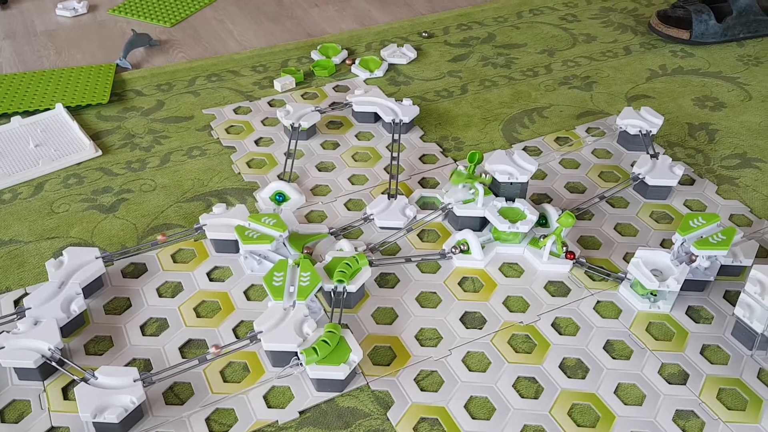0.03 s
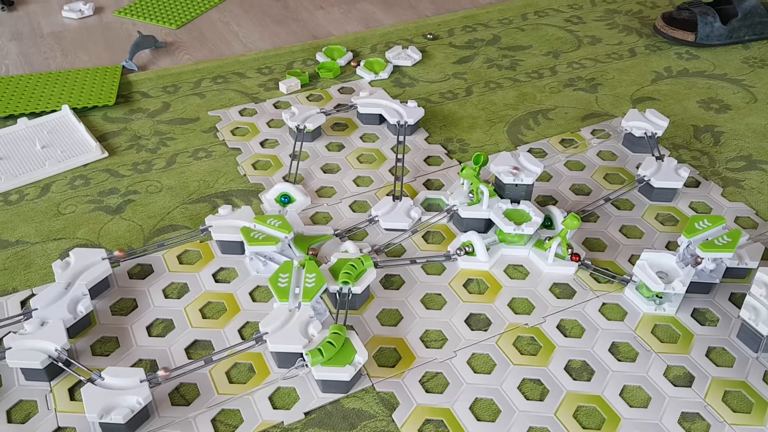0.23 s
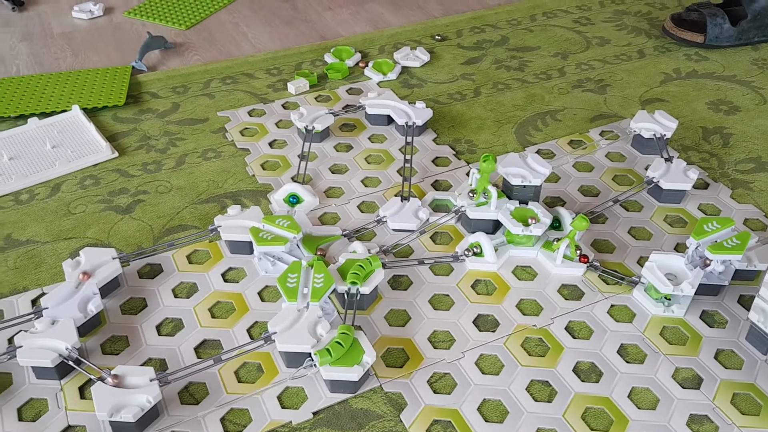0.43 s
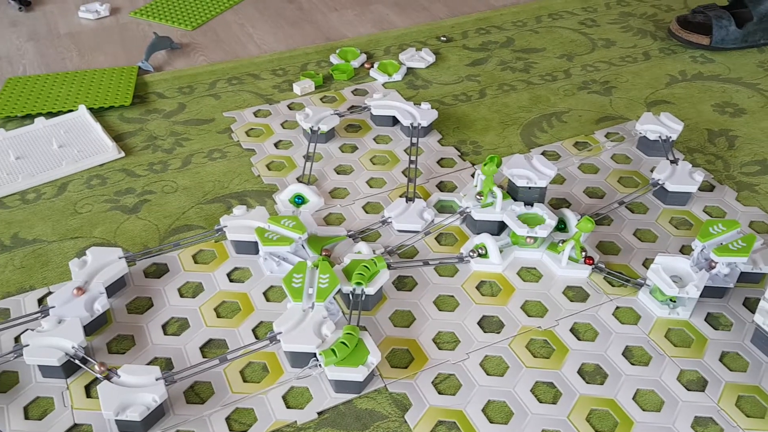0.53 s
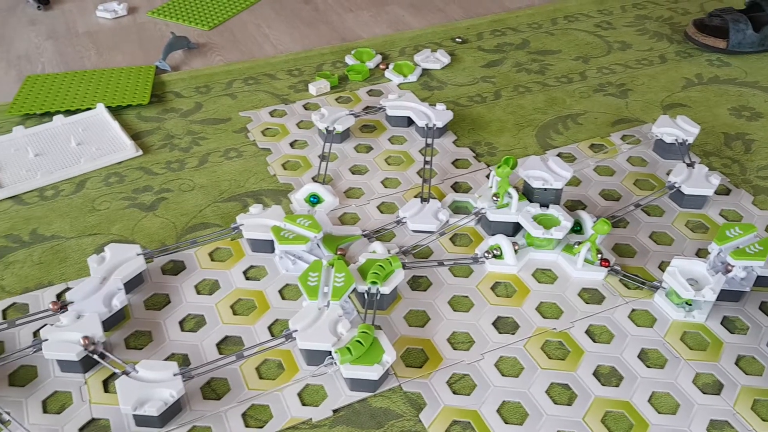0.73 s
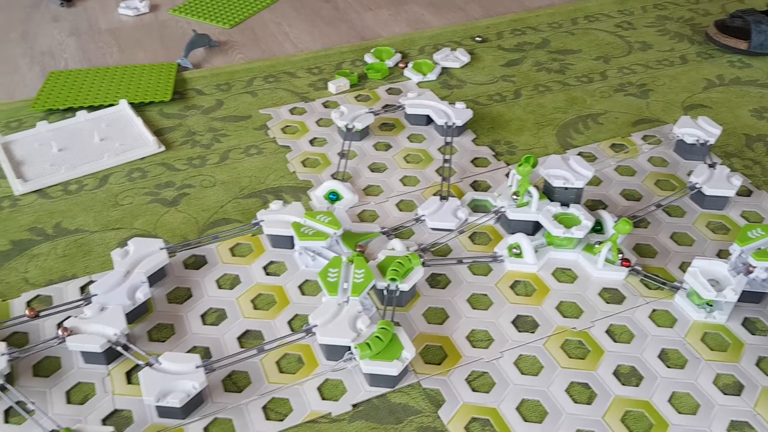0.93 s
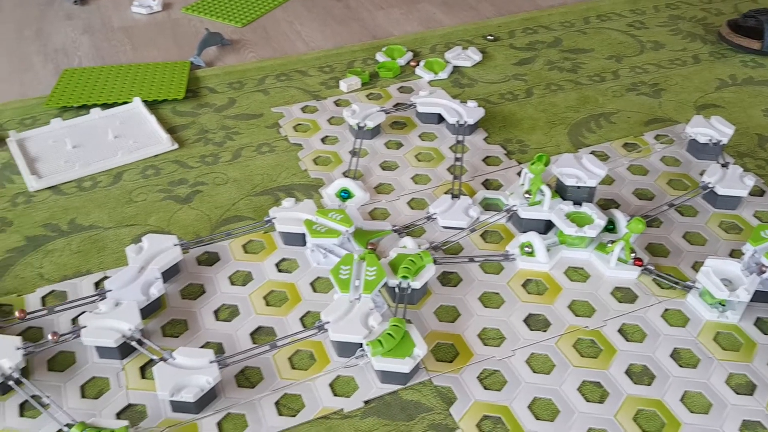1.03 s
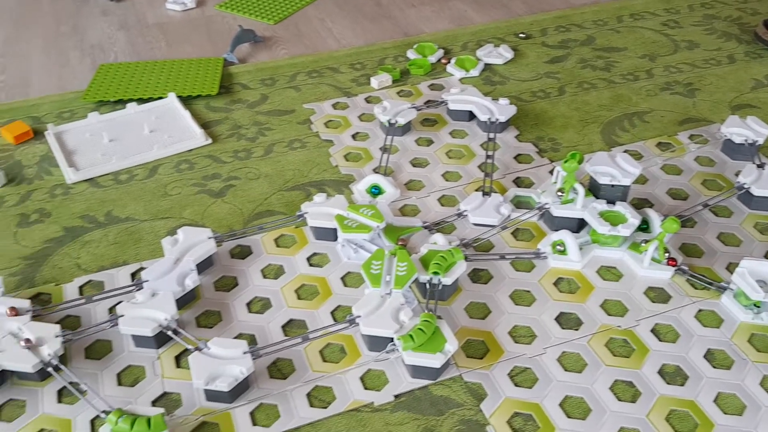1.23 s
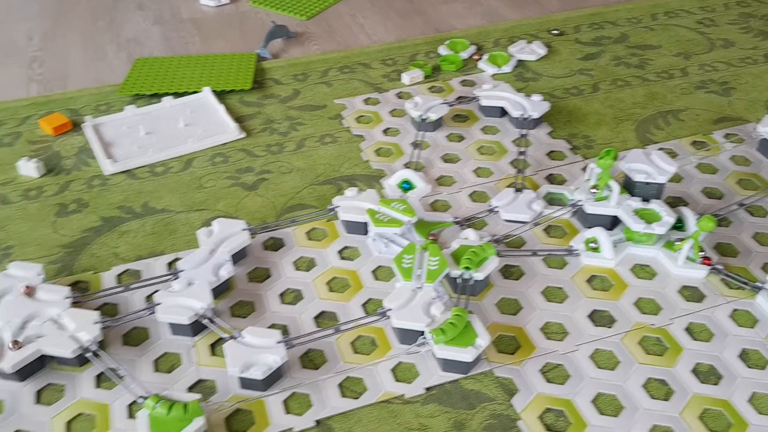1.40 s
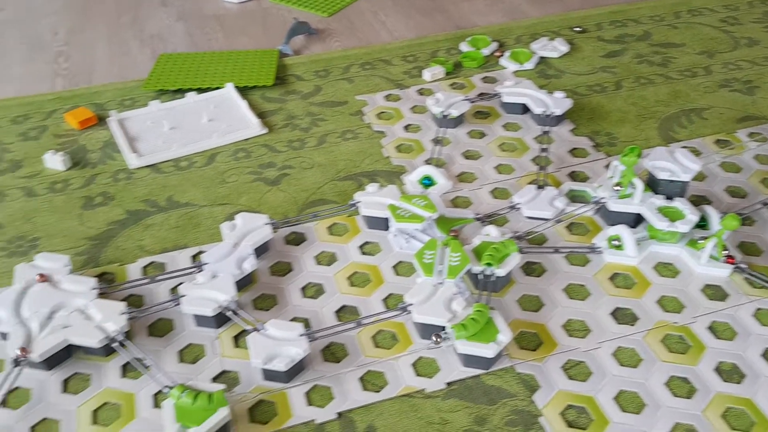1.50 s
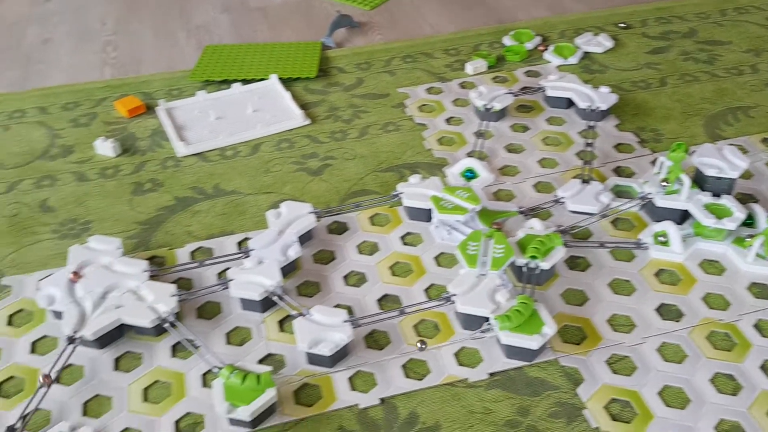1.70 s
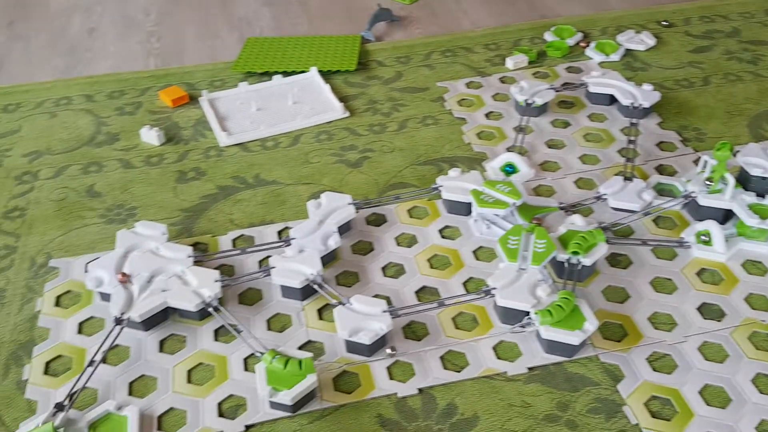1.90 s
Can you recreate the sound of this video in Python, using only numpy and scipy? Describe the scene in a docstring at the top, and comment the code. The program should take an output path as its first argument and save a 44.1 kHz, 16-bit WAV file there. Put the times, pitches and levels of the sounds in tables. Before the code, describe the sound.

Marbles rattle along the rails of a plastic track, clacking against its pieces. One strikes another with a high, bright click, and the rolling continues with lighter knocks. The room adds a short echo and a faint hum.

```python
"""Steel marbles roll, rattle and clack through a plastic marble track on the floor of a fairly live room.
Each hit on a tile or switch rings that plastic piece and, faintly, the rails; at joints the marbles
skitter in quick runs of contacts. One hard steel-on-steel strike rings high and bright. The rolling is
a stream of tiny random contacts on the rails, over a faint low room hum."""
import sys
import numpy as np
from scipy import signal
from scipy.fft import rfft, irfft
from scipy.io import wavfile

SR = 44100
rng = np.random.default_rng(int(sys.argv[2]) if len(sys.argv) > 2 else 0)


def to_wav(s):
    """Save 16-bit WAV."""
    ch = np.atleast_2d(s).T  # columns
    pcm = np.round(np.clip(ch, -1, 1) * 32767)  # PCM
    wavfile.write(sys.argv[1], SR, pcm.astype(np.int16))


N = 85995
SIZE = 2 ** 15  # samples per hit
HZ, T = np.fft.rfftfreq(SIZE, 1 / SR), np.arange(SIZE) / SR
SCENE_HZ = np.fft.rfftfreq(N, 1 / SR)
HIT_GAIN = np.sqrt(.004 * SR)  # unit energy to rms 1 over 4 ms


# marble on plastic: (time [s], level [dB], body [dB], knock [dB], treble [dB], tail [dB],
# resonances of the piece [(frequency [Hz], level is not set per resonance)])
CLACKS = [(.2212, -32.5, -3.5, 0.5, -14, -1, [290, 880, 1110, 1320, 1760, 2760]),
          (.229, -30, -8.5, -1, -6, -1.5, [780, 1110, 1850]),
          (.4032, -17, 0, -6, -2, -1, [360, 640, 2780, 2980]), (.4175, -21.5, -6, 0.5, 1, -2, [6400, 6400]),
          (.483, -25, 0.5, -0.5, -4.5, 2, [4770]), (.5388, -25.5, -1, 4.5, 4, -1.5, [1280, 1950, 3990]),
          (.5665, -26.5, -3, 2, -7, -1, [1650, 2740, 4660]),
          (.5915, -31.5, 4.5, 7.5, 3, -1.5, [1500, 2030, 5900]), (.6885, -38.5, 7, 0, -6, -7, [840, 730]),
          (.8027, -21.5, -7.5, -16, 10.5, 2, [5250]), (.808, -26.5, -3.5, -1.5, -10, -1, [300, 1050]),
          (.9793, -29.5, 0, -3, 0, -2, [700, 1900, 2050, 6080]), (1.0185, -31, -1.5, -4, -4.5, 2, []),
          (1.3197, -33.5, 1, 1.5, -10.5, -1, [4270]), (1.3387, -35, 1.5, -6, -15, -4, [1770]),
          (1.4445, -41, 8.5, 3.5, -10, 0, [950, 1420, 1720]), (1.5448, -36.5, 7.5, 1, -11, -1, []),
          (1.6805, -38.5, 4, 0.5, -15, -5, [950, 1150, 2100, 4100]),
          (1.9067, -33.5, -4, 1.5, -10, -2, [930, 1290, 2180])]
# further hits on the plastic pieces, all with one shared tone: (time [s], level [dB])
TICKS = [(.111, -41.5), (.312, -41), (.796, -30.5), (1.109, -35.5), (1.129, -41.5), (1.1915, -35),
         (1.292, -39.5), (1.358, -41), (1.859, -37.5)]
# tone of all ticks: (body [dB], knock [dB], treble [dB], tail [dB])
TICK_TONE = (-3.5, -7, -9.5, -1)

def clacks_and_ticks():
    """Single impacts of marbles on the plastic pieces of the track."""
    ticks = [(s, db, *TICK_TONE, []) for s, db in TICKS]
    return plastic_hits(CLACKS + ticks, impact)


# runs over joints: (time [s], level [dB], body [dB], knock [dB], treble [dB], tail [dB], resonances [Hz])
SKITTERS = [(.463, -27.5, -3, 2, -14, 0, [750, 2920]), (.678, -37.5, 7.5, 6, -1, -0.87, [2750, 4700]),
            (.861, -28, -10, -6.5, 6.5, -0.47, [7830]), (.937, -33, -6.5, -5, -1, -0.51, []),
            (1.375, -41.5, -2, 2, -24, -0.084, [4400]), (1.481, -34, 0.5, -10.5, -10, 0, []),
            (1.886, -35.5, -9, -3, -7, -1, [])]

def skitters(swell_s=.0043):
    """A marble crosses a joint in a run of contacts that swells and dies within milliseconds."""
    return plastic_hits(SKITTERS, lambda: chatter(T * decay(swell_s)))


# spectrum of struck plastic: (frequency [Hz], gain [dB])
PLASTIC_SPECTRUM = [(50, -24), (170, -11.5), (290, -4.5), (450, -5), (720, 1), (1500, 4), (5400, 4),
                    (7100, 7), (8400, -10.5), (12000, -4), (15800, -9)]
# faint rings of rails and plates: (frequency [Hz], level [dB])
RAIL_MODES = [(1670, -20), (2055, -21), (2727, -21.5), (6795, -25)]
BODY_HZ, KNOCK_HZ, SNAP_HZ, TREBLE_HZ = 666, 1890, 5400, 10700

def plastic_hits(hits, contact):
    """Each contact rings one plastic piece; rails and room ring on as a tail."""
    out = np.zeros((2, N))
    plastic_db = lookup(PLASTIC_SPECTRUM, HZ)
    plastic_db -= 10 * np.log10(np.mean(amp(plastic_db) ** 2))
    tails = [rfft(room_tail() + ring(RAIL_MODES, t60_s=.16)) for _ in range(4)]
    for k, (s, db, body, knock, treble, tail_db, resonances) in enumerate(hits):
        tone_db = lookup([(BODY_HZ, body), (KNOCK_HZ, knock), (SNAP_HZ, 0), (TREBLE_HZ, treble)], HZ)
        response = minimum_phase(plastic_db + tone_db + piece_lift_db(resonances))
        ears, tail_gain = position(s)
        direct = rfft(contact()) * ears
        tail = tail_gain * amp(tail_db) * tails[k % len(tails)]
        add(out, s, amp(db) * HIT_GAIN * irfft((direct + tail) * response))
    return out


def piece_lift_db(resonances, peak_db=10):
    """Resonances of a hollow piece; higher ones are wider and die sooner."""
    power = 1
    for hz in resonances:
        width_hz = 60 + .025 * hz
        power += amp(2 * peak_db) / (1 + (2 * (HZ - hz) / width_hz) ** 2)
    return 10 * np.log10(power)


def impact():
    """A clean hit: one impulse, then quickly dying chatter."""
    return unit_energy(amp(-8.5) * (T == 0) + amp(1) * chatter(decay(tau_s=.0031)))


def chatter(envelope):
    """Tiny contacts and near reflections, as noise under an envelope."""
    return unit_energy(stereo_noise(SIZE, correlation=.5) * envelope)


# high rings of steel: (frequency [Hz])
STEEL_MODES_HZ = [11032, 11635, 11840, 12480, 13163, 13470, 13778, 14605, 14900, 15214, 15450]
# spectrum of the crash: (frequency [Hz], gain [dB])
CRASH_SPECTRUM = [(2000, -34), (4500, -11), (7000, -9.5), (9000, -14), (11000, -3), (13000, 0),
                  (15500, -1.5)]

def steel_strike(time_s=.8028, gain_db=-15.8, ring_db=-15, tilt_db_per_oct=8):
    """Steel on steel: a bright crash and a dense cluster of very high rings."""
    out = np.zeros((2, N))
    burst = amp(-2) * chatter(decay(tau_s=.006)) + amp(4.5) * room_tail()
    crash = irfft(rfft(burst) * minimum_phase(lookup(CRASH_SPECTRUM, HZ)))
    top_hz = max(STEEL_MODES_HZ)
    modes = [(hz, ring_db + tilt_db_per_oct * np.log2(hz / top_hz)) for hz in STEEL_MODES_HZ]
    strike = crash + ring(modes, t60_s=.3)
    add(out, time_s, amp(gain_db) * HIT_GAIN * strike * pan(left_minus_right_db=-3.5))
    return out


# rolling levels: (time [s], rumble [dB], rattle [dB])
ROLL_LEVELS = [(0, -55, -54), (.1, -67, -61), (.38, -50.5, -54), (.5, -60.5, -70.5), (.78, -44.5, -53.5),
               (.95, -50.5, -49), (1.27, -53, -53.5), (1.38, -49.5, -50), (1.46, -47, -59.5),
               (1.57, -51.5, -48), (1.65, -58, -56), (1.83, -60.5, -57.5)]
# rolling spectra: (frequency [Hz], rumble [dB], rattle [dB])
ROLL_SPECTRA = [(99, -10, -57), (450, -2.5, -28), (760, 5.5, -16), (1490, 2, 6), (3400, -8.5, -4),
                (4840, -20.5, 5), (6980, -16, -4), (8180, -44, -15), (15800, -41, -21)]

def rolling(contacts_per_s, spread_db, column):
    """Random small contacts of marbles on rails, heard directly and through the room."""
    strength = amp(spread_db * np.minimum(rng.exponential(1, N), 4))
    contacts = strength * rng.choice([-1, 1], N) * (rng.random(N) < contacts_per_s / SR)
    response = impact() + amp(5) * room_tail()
    # second of two passes: the room is already ringing at the start
    steady = signal.fftconvolve(np.tile(contacts, 2)[None], response, axes=1)[:, N:2 * N]
    levels = np.array(ROLL_LEVELS)
    level_db = np.interp(np.arange(N) / SR, levels[:, 0], levels[:, column])
    return amp(level_db) * coloured(steady, lookup(ROLL_SPECTRA, SCENE_HZ, column))


# path of the marbles: (time [s], left ear lead [ms], left minus right [dB], tail [dB])
PATH = [(.2, -0.056, -2, 5), (.42, -0.062, -0.5, 0), (.8, -0.065, -2, 2), (1.0, -0.014, -0.5, -2),
        (1.4, 0.23, -1, -3.5), (1.901, 0.15, 3.5, 3.5)]

def position(s):
    """Delay and gain at each ear, and tail gain, for a hit at this point of the path."""
    times, *columns = np.transpose(PATH)
    lead_ms, side_db, tail_db = [np.interp(s, times, column) for column in columns]
    delay_s = np.round(np.maximum([[-lead_ms], [lead_ms]], 0) * SR / 1000) / SR
    return np.exp(-2j * np.pi * HZ * delay_s) * pan(side_db), amp(tail_db)


# reverberation: (frequency [Hz], t60 [s], level [dB], left-right correlation [0..1])
ROOM_BANDS = [(98.7, 0.38, 3.5, 0.9), (342, 0.42, 0.5, 0.83), (694, 0.74, 0.5, 0.67), (1670, 0.61, 3, 0),
              (6500, 0.48, -3.5, 0), (12200, 0.32, 1, 0), (15900, 0.248, 3, 0.11)]

def room_tail(onset_s=.0029, build_s=.0066):
    """A diffuse tail; the top treble dies first and the bass is alike at both ears."""
    hz, t, bands = signal.stft(rng.standard_normal((2, SIZE)), SR, nperseg=256)
    t60_s, level_db, correlation = [lookup(ROOM_BANDS, hz, column)[:, None] for column in (1, 2, 3)]
    bands[1] = correlation * bands[0] + np.sqrt(1 - correlation ** 2) * bands[1]
    dying = bands * amp(level_db - 60 * t / t60_s) / np.sqrt(t60_s)
    tail = signal.istft(dying, SR, nperseg=256)[1][:, :SIZE]
    return unit_energy(tail * np.clip((T - onset_s) / build_s, 0, 1))


# room noise: (frequency [Hz], gain [dB])
HUM_SPECTRUM = [(25, -20.5), (55, 2), (115, -4), (400, -11), (1500, -38.5), (9000, -39.5)]

def room_hum(level_db=-62.5):
    """Steady noise: low hum and faint hiss."""
    return amp(level_db) * coloured(stereo_noise(N, correlation=.76), lookup(HUM_SPECTRUM, SCENE_HZ))


def ring(modes, t60_s):
    """Dying sines, each with its own phase at each ear."""
    out = np.zeros((2, SIZE))
    fade = amp(-60 * T / t60_s)
    for hz, db in modes:
        out += amp(db) * unit_energy(np.sin(2 * np.pi * (hz * T + rng.random((2, 1)))) * fade)
    return out


def stereo_noise(samples, correlation):
    """White noise, partly alike at both ears."""
    left, other = rng.standard_normal((2, samples))
    return np.array([left, correlation * left + np.sqrt(1 - correlation ** 2) * other])


def minimum_phase(db):
    """Causal response with the given gains."""
    cepstrum = irfft(np.log(amp(db)))
    cepstrum[1:SIZE // 2] *= 2
    cepstrum[SIZE // 2 + 1:] = 0
    return np.exp(rfft(cepstrum))


def coloured(x, db):
    """Scene-long signal shaped by a spectrum, at rms 1."""
    return unit_energy(irfft(rfft(x) * amp(db), N)) * np.sqrt(N)


def lookup(table, hz, column=1):
    """One table column, interpolated over log frequency."""
    table = np.array(table)
    return np.interp(np.log(hz + 1), np.log(table[:, 0]), table[:, column])


def amp(db):
    return 10 ** (np.asarray(db) / 20)


def decay(tau_s):
    return np.exp(-np.minimum(T / tau_s, 50))


def pan(left_minus_right_db):
    return amp([[left_minus_right_db / 2], [-left_minus_right_db / 2]])


def unit_energy(x):
    return x / np.sqrt((x ** 2).sum(-1, keepdims=True) + 1e-20)


def add(mix, s, sound):
    """Mixes a stereo sound in at time s."""
    part = mix[:, max(round(s * SR), 0):][:, :SIZE]
    part += sound[:, :part.shape[1]]


def scene():
    """Rolling rumble and rattle, room hum, the steel strike and the hits on the track."""
    rumble = rolling(contacts_per_s=2500, spread_db=5.5, column=1)
    rattle = rolling(contacts_per_s=440, spread_db=2.5, column=2)
    return rumble + rattle + room_hum() + steel_strike() + clacks_and_ticks() + skitters()


def record(dry):
    """Steep low-pass at 15.78 kHz."""
    lowpass = signal.firwin(511, 15780, window=("kaiser", 9), fs=SR)
    return signal.oaconvolve(dry, lowpass[None], "same")


dry = scene()
out = record(dry)
to_wav(out)
```